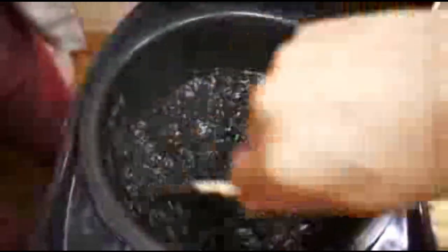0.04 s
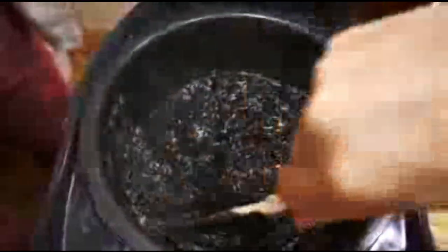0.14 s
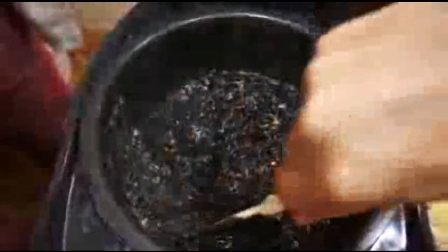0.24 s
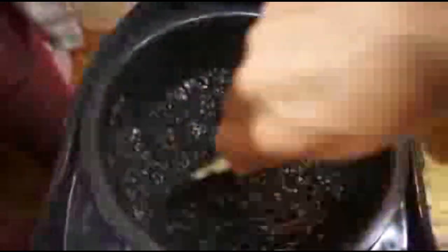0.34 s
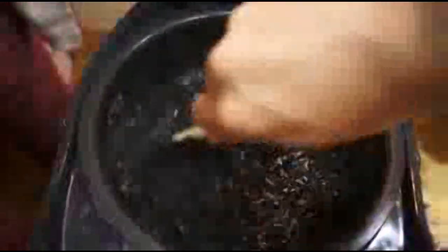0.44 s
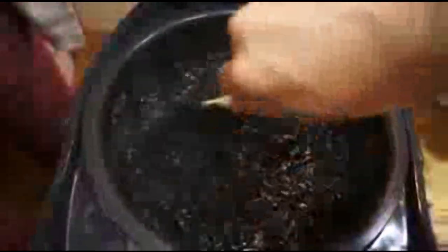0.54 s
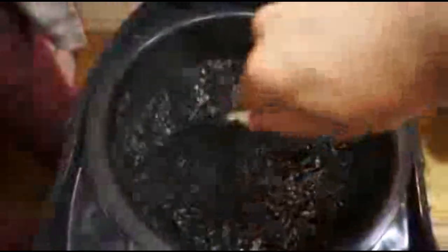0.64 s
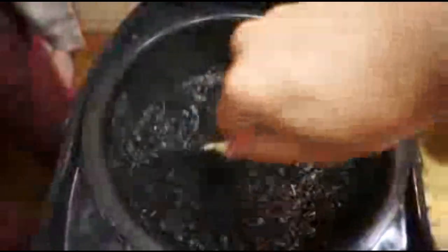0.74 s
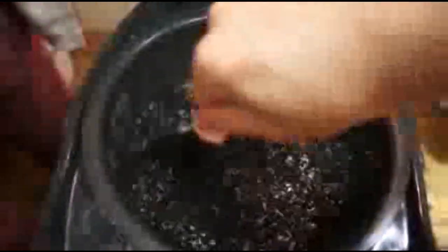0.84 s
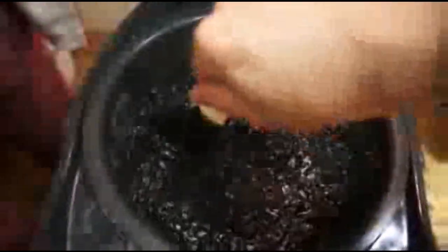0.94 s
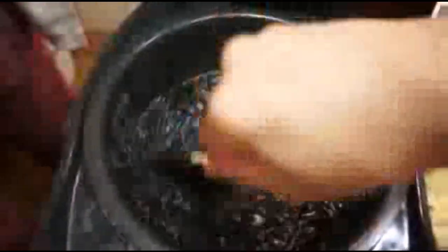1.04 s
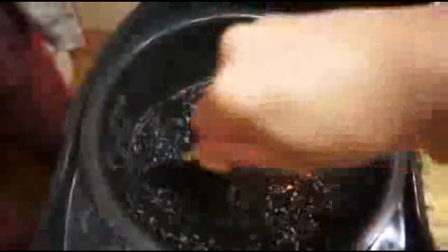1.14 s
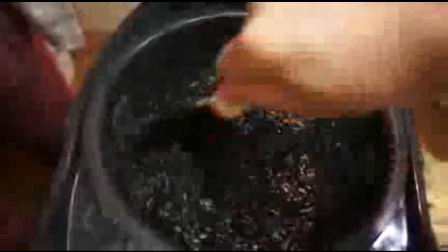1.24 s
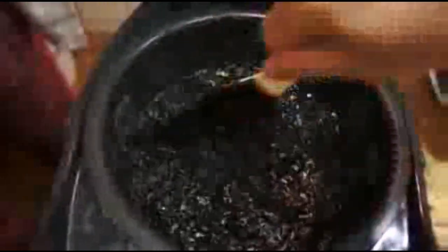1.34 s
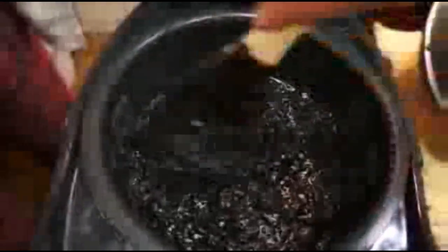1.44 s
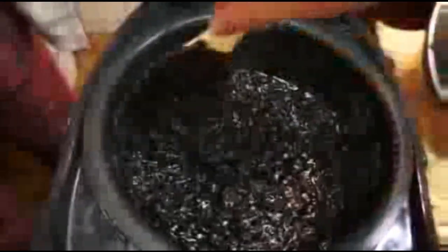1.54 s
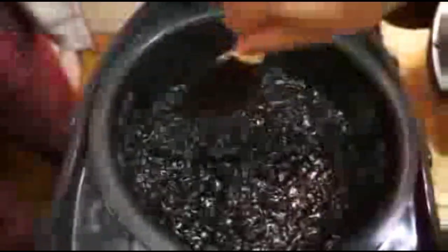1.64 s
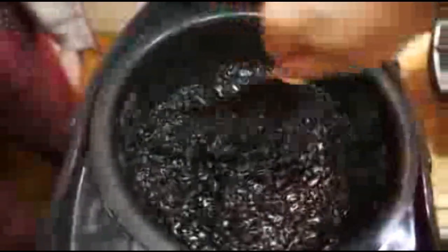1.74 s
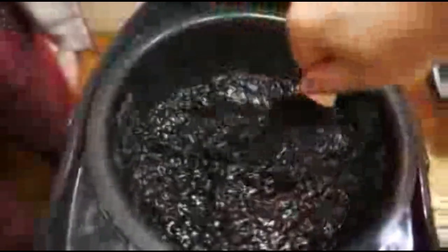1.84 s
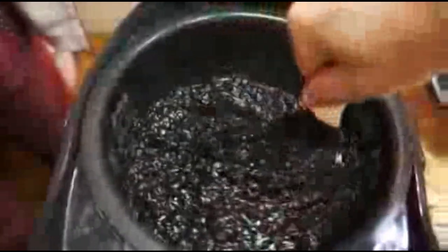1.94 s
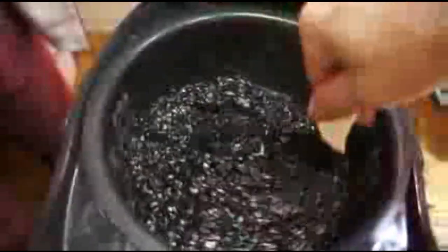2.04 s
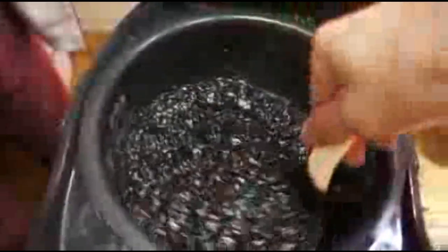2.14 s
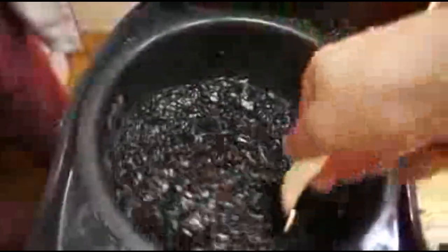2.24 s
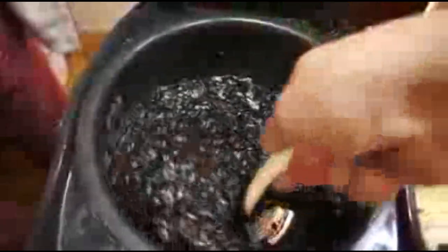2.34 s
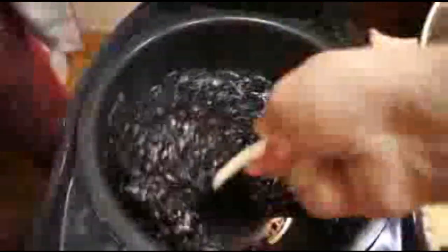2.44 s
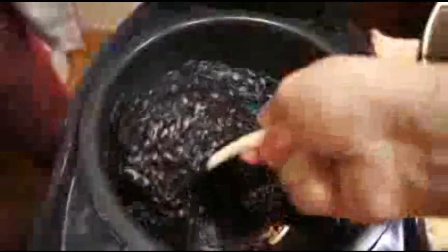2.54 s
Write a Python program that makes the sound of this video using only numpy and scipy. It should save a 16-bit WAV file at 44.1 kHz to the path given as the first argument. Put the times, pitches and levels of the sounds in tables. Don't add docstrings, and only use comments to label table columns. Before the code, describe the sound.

A rice paddle knocks and scrapes a heavy pot of sticky rice, with wet crackling grains

```python
import sys
import numpy as np
from scipy import signal
from scipy.fft import rfft, irfft, next_fast_len
from scipy.io import wavfile
from scipy.ndimage import uniform_filter1d, map_coordinates

SR = 44100
rng = np.random.default_rng(int(sys.argv[2]) if len(sys.argv) > 2 else 0)


def ratio(d):
    e = np.asarray(d, float) / 20
    return 10 ** e


def dump(signal):
    limited = np.clip(np.atleast_2d(signal).T, -1, 1)
    pcm = np.round(limited * 32767).astype(np.int16)
    wavfile.write(sys.argv[1], SR, pcm)


N = 114660

# pitch_hz, level_db, t60_s
POT = [(260.6, -7.5, 0.064), (302.3, -6, 0.037), (487.7, 0.5, 0.077), (533.5, 3, 0.076), (730, -1, 0.02),
       (1070, -2, 0.022), (1305, 0.5, 0.043), (1440, -8, 0.015), (2091, -4, 0.037), (2850, -6, 0.044),
       (3393, -4, 0.031), (5270, -4.5, 0.011), (6510, 7.5, 0.0083), (7150, -5, 0.071)]
# start_s, peak_db, contact_hz, ring_db, crack_db
WALL = [
    (0.1143, -22.5, 2025, 1.5, -20),
    (0.6124, -30.5, 3320, -3.5, -2.5),
    (1.736, -25.5, 1690, -3.5, -10.5),
]
# start_s, peak_db, contact_hz, ring_db, crack_db
BOTTOM = [
    (.4605, -27.5, 553, -3, -17.5),
    (0.907, -42, 321, 3, -3),
    (.9895, -19, 1404, -21.5, -46),
    (1.282, -24.5, 717, -6.5, -28),
    (1.9134, -27.5, 1430, -4.5, -26),
    (1.9145, -22.5, 343, -4.5, -49),
    (2.179, -26, 5200, -4, -9.5),
    (2.1808, -16.5, 997, -15.5, -19),
    (2.563, -32, 1910, -8.5, -31),
]


def unit(x):
    return x / np.sqrt(np.mean(x ** 2) + 1e-20)


def along(points, hz):
    f, v = np.transpose(points)
    return np.interp(np.log(hz + 1), np.log(f + 1), v)


def wobble(rate):
    knots = rng.standard_normal(int(N * rate / SR) + 4)
    return map_coordinates(knots, [np.arange(N) * rate / SR])


def filtered(x, response):
    m = next_fast_len(N + SR // 2)
    return irfft(rfft(x, m) * response(np.fft.rfftfreq(m, 1 / SR)), m)[..., :N]


def add(track, s, sound):
    part = track[..., max(round(s * SR), 0):][..., :sound.shape[-1]]
    part += sound[..., :part.shape[-1]]


def gritty(rate, spread_db, bed_db):
    draw = rng.random((2, N))
    size = ratio(-spread_db * np.log(draw[1] + 1e-9))
    slips = (draw[0] < rate / SR) * size * rng.standard_normal(N)
    return unit(unit(slips) + ratio(bed_db) * rng.standard_normal(N))


def pair(a, b):
    # pitch_hz, left-right likeness (0 to 1)
    likeness = [(60, 0.97), (500, 0.93), (2000, 0.74), (5000, 0.27), (8000, 0.5)]

    def spread(hz):
        turn = np.arccos(np.clip(along(likeness, hz), -1, 1)) / 2
        return np.array([np.cos(turn), np.sin(turn)])

    mid, side = filtered(np.array([a, b]), spread)
    return np.array([mid + side, mid - side])


def pops(s, hz, db, size_db, cycles):
    k, draw = np.arange(200), rng.random((len(s), 2, 1))
    cyc = k / SR * np.minimum(hz, 7900)[:, None]
    level_db = db[:, None] - size_db * np.log(draw[:, 0] + 0.019) - 30 * cyc / cycles
    wave = ratio(level_db) * np.sin(2 * np.pi * cyc)
    at = ((s[:, None] * SR).astype(int) + k).ravel()
    sides = (1, np.sign(draw[:, 1] - .5))
    return pair(*[np.bincount(at, (wave * g).ravel(), N + SR)[:N] for g in sides])


def starve(x):
    ahead_s, length_s, depth_db, threshold_db = .021, .013, -20, -29
    t, dip_db = np.arange(N) / SR, 0
    for s, peak_db, *_ in WALL + BOTTOM[:4]:
        dip = np.exp(-((t - s + ahead_s - length_s / 2) / length_s * 2) ** 4)
        dip_db = dip_db + depth_db * dip / (1 + ratio(2 * (threshold_db - peak_db)))
    return x * ratio(dip_db)


def gaps(x):
    hole_db, hole_s, odds, nearness, spared_s = -22, .055, 1.8, 1.7, .011
    hz, s, z = signal.stft(x, SR, nperseg=512)
    field = uniform_filter1d(rng.standard_normal(z.shape[1:]), size=7, axis=0)
    field = unit(uniform_filter1d(field, size=3, axis=1))

    def bump(rows, width_s):
        return np.minimum(sum(np.exp(-((s - row[0]) / width_s) ** 2) for row in rows), 1)

    free = 1 - bump(WALL + BOTTOM, spared_s)
    treble = ((hz > 1700) & (hz < 7600))[:, None]
    holes = (field + nearness * bump(BOTTOM[:5] + [(2.14,)], hole_s) > odds) * treble
    return signal.istft(z * ratio(free * hole_db * holes), nperseg=512)[1][:, :N]


def gated(x):
    gate_db = -101
    z = signal.stft(x, nperseg=512)[2]
    power = uniform_filter1d(np.mean(np.abs(z) ** 2, 0), size=5, axis=0)
    power = uniform_filter1d(power, size=4, axis=1)
    return signal.istft(z * (power > ratio(2 * gate_db)), nperseg=512)[1][:, :N]


def hush():
    # pitch_hz, level_db per Hz
    air_curve = [(15, -43), (25, -26), (157, -13.5), (2640, -24), (2900, -28.5), (6760, -24), (8000, -19.5),
                 (10400, -32.5), (17600, -120)]
    air_db, whine_db, whine_hz, whine_wide_hz = -65, -76, 7900, 180
    air = unit(pair(*filtered(rng.standard_normal((2, N)), lambda f: ratio(along(air_curve, f)))))
    whine = filtered(rng.standard_normal((2, N)), lambda f: np.exp(-((f - whine_hz) / whine_wide_hz) ** 2))
    return ratio(air_db + 0.32 * wobble(6)) * air + ratio(whine_db) * unit(whine)


def room(x):
    # pitch_hz, t60_s
    decay = [(200, 0.42), (2000, 0.2), (8000, 0.16)]
    hz, t, z = signal.stft(rng.standard_normal((2, SR // 2)), SR, nperseg=256)
    tail = signal.istft(z * ratio(-60 * t / along(decay, hz)[:, None]), SR, nperseg=256)[1]
    tail = tail / np.linalg.norm(tail[0])
    late = np.pad(x, (200, 0))[None]
    return pair(*signal.fftconvolve(late, tail, axes=1)[:, :N])


def lurch():
    # start_s, length_s
    moments = [(.46, .11), (.27, .06), (1.02, .13), (1.92, .14), (1.25, .14), (.62, .1), (2.1, .1),
               (1.275, .05)]
    # level_db, pitch_hz
    pushes = [
        (-53, 43),
        (-59, 210),
        (-67, 45),
        (-56.5, 39),
        (-68, 33),
        (-70, 49),
        (-68, 18),
        (-60.5, 132),
    ]
    out = np.zeros(N)
    for (s, length), (db, hz) in zip(moments, pushes):
        t = np.arange(int(length * SR)) / SR
        add(out, s, ratio(db) * np.sin(np.pi * t / length) ** 2 * np.sin(2 * np.pi * hz * t))
    return out


def slides():
    # start_s, length_s
    moments = [(.15, .1), (.55, .06), (.6, .08), (.88, .06), (1.34, .16), (1.82, .14), (2.185, .07),
               (2.2, .22), (2.42, .18)]
    # level_db, start_hz, end_hz
    drifts = [
        (-47.5, 7500, 5900),
        (-72, 1500, 2900),
        (-49.5, 7100, 6800),
        (-60.5, 1500, 2900),
        (-55, 8400, 6700),
        (-55, 3840, 2600),
        (-51.5, 6300, 8100),
        (-63.5, 3400, 2870),
        (-61, 2500, 2200),
    ]
    rate, cycles, spread_oct, size_db = 1900, 9.2, .12, 3
    rows = []
    for (s, length), (db, hz0, hz1) in zip(moments, drifts):
        where, spread = rng.random(400), rng.standard_normal(400)
        hz = (hz0 + (hz1 - hz0) * where) * 2 ** (spread_oct * spread)
        level_db = db + 10 * np.log10(np.sin(np.pi * where) + .01)
        rows.append(np.c_[s + length * where, hz, level_db][:int(rate * length)])
    return pops(*np.concatenate(rows).T, size_db, cycles)


def ticks():
    # start_s, peak_db, pitch_hz
    single_ticks = [(.145, -41, 4200), (.158, -42, 2980), (.161, -45, 7160), (.191, -42, 4300),
                    (.204, -42, 6540), (.212, -39.5, 6700), (.218, -35.5, 6850), (.231, -36.5, 5650),
                    (.232, -45, 4300), (.263, -41, 7240), (.343, -59.5, 3500), (.379, -43, 6540),
                    (.419, -43, 6100), (.857, -45, 7500), (1.019, -45, 5700), (1.274, -41, 6300),
                    (1.336, -43, 6400), (1.3765, -40, 7600), (1.417, -61, 7260), (1.429, -39, 7700),
                    (1.861, -48.5, 3420), (1.983, -48.5, 2500), (2.0275, -46.5, 6800), (2.029, -55, 4000),
                    (2.157, -45.5, 5030), (2.229, -39, 7200), (2.3084, -43, 3660), (2.378, -45, 6700),
                    (2.433, -46, 2450), (1.39, -53, 7250), (1.436, -49.5, 3980), (1.833, -45.5, 3340),
                    (1.8435, -49.5, 3500), (1.518, -51, 2230), (.32, -40, 6400)]
    burst_s, spread_oct, cycles, pop_db = 0.0028, 0.18, 16, -6.5
    s, db, hz = np.repeat(single_ticks, 6, axis=0).T
    draw = rng.standard_normal((len(s), 2))
    when = s + burst_s * np.abs(draw[:, 0]) / 2
    return pops(when, hz * 2 ** (spread_oct * draw[:, 1]), db + pop_db, 0.86, cycles)


def stroke():
    # start_s, pressure_db on the pot, slip_db through the grains
    motion = [(0, -70.5, -84), (.1, -72.5, -67.5), (.19, -55, -52), (0.298, -68, -62.5),
              (0.532, -64, -66.5), (.6, -54, -53.5), (0.802, -68, -67.5), (0.892, -45, -65),
              (.96, -52, -61.5), (1.06, -59.5, -67.5), (1.17, -60, -80.5), (1.36, -57, -68.5),
              (1.599, -70, -64.5), (1.719, -70, -96), (1.8, -59.5, -66), (2.0, -57, -72), (2.26, -55, -60),
              (2.6, -59.5, -73.5)]
    # start_s, length_s, extra_pressure_db
    rubs = [
        (0.35, 0.028, 1),
        (0.2815, 0.033, 11),
        (1.97, 0.025, 6),
        (2.7, 0.11, 10),
        (3.2, .06, 7),
        (0.75, 0.069, 2),
        (.84, 0.071, -7),
        (2.38, 0.062, 0.5),
        (2.47, 0.19, 6.5),
        (0.89, 0.037, 4.5),
    ]
    slip_rate, slip_spread_db, bed_db, tilt_db = 500, -2, -11, -9.5
    fizz_hz, fizz_oct, fizz_cycles, fizz_size_db, fizz_count = 3960, 0.79, 16, 3.5, 5000
    s, press_db, slip_db = np.transpose(motion)

    def body(f):
        total = 0
        for k, (c, db, t60) in enumerate(POT):
            width = 6 / t60
            gain = (-1) ** k * ratio(db + tilt_db * np.log2(c / 500))
            total = total + gain * 1j * f * width / (c * c - f * f + 1j * f * width)
        return total

    drag = unit(pair(*[filtered(gritty(slip_rate, slip_spread_db, bed_db), body) for side in "ab"]))
    when = rng.random(fizz_count) * N / SR
    hz = fizz_hz * 2 ** (fizz_oct * rng.standard_normal(fizz_count))
    fizz = unit(pops(when, hz, 0 * when, fizz_size_db, fizz_cycles))
    t = np.arange(N) / SR
    rub_db = sum(db * np.exp(-((t - at - length / 2) / length * 2) ** 4) for at, length, db in rubs)
    drag_db = np.interp(t, s, press_db) + rub_db + 3.35 * wobble(29.81)
    fizz_db = np.interp(t, s, slip_db) + 3 * wobble(40.57)
    return drag * ratio(drag_db) + fizz * ratio(fizz_db)


def paddle():
    # start_s, peak_db, contact_hz, crack_db
    light_taps = [(0.318, -51, 264, -5), (0.365, -44.5, 504, -9.5), (0.429, -39.5, 545, -15),
                  (0.592, -44, 550, -5.5), (.66, -43.5, 598, -17), (0.725, -50.5, 463, 2),
                  (.9068, -30.5, 2300, -30), (0.886, -44, 467, -18), (.996, -33.5, 470, -35),
                  (1.029, -42.5, 605, -36), (1.04, -42.5, 6060, -18), (1.096, -42, 6400, -30),
                  (1.163, -48, 2200, -18), (1.221, -37.5, 313, -22), (1.232, -40, 6400, -26),
                  (0.6134, -30.5, 1570, -32), (1.518, -45.5, 2260, -4), (1.833, -53.5, 3140, -6),
                  (1.844, -58, 3100, 12), (1.9, -34.5, 3360, -27), (1.941, -39.5, 3160, -22),
                  (1.969, -37.5, 510, -30), (2.112, -66.5, 3450, 6), (2.185, -40, 314, -35),
                  (2.3, -35.5, 580, -24), (2.497, -42.5, 755, -13.5), (2.521, -44.5, 285, -14.5),
                  (2.58, -54.5, 590, 10)]
    # start_s, peak_db, contact_hz, ring_db,
    # crack_db
    more_blows = [
        (0.13, -35, 600, 4.5, -48.5),
        (0.59, -36, 570, 0.5, -32),
        (.1168, -25, 1430, 1.5, -27),
        (.9892, -32, 2300, -8, -42),
        (.9905, -30.5, 535, -1.5, -35),
        (1.2822, -41.5, 3260, 0, -26),
        (1.9135, -25, 3000, -19, -18),
        (1.9165, -26, 238, 1, -51.5),
        (1.915, -26.5, 630, -8.5, -36),
        (2.184, -30, 1250, -4, -31),
    ]
    wall_damp, bottom_damp, detune = 0.89, 0.47, 0.073
    tap_ring_db, rattle_db, rattle_s = -2.5, -9.5, 0.095
    contact_cycles, swell_s, reach_oct, scatter_db = 2.5, 0.00036, 1.0, 1.5
    crack_s, crack_rise_s, crack_band_hz = .022, .0012, (2200, 6000)
    puff_db, puff_s = -35.5, 0.36
    smear_s, smear_db = .011, -28
    low_cut_hz = 94
    out, t = np.zeros((2, N + SR)), np.arange(SR // 4) / SR
    hz, level_db, t60 = np.transpose(POT)[:, :, None]
    bright = signal.butter(1, crack_band_hz, "band", fs=SR)
    hits = [(*row, wall_damp) for row in WALL + more_blows]
    hits += [(*row, bottom_damp) for row in BOTTOM]
    hits += [(s, db, c, tap_ring_db, k, bottom_damp) for s, db, c, k in light_taps]
    for s, db, contact_hz, ring_db, crack_db, damp in hits:
        u = t * contact_hz / contact_cycles
        push = np.sin(np.pi * np.minimum(u, 1)) ** 2 * np.sin(2 * np.pi * contact_hz * t)
        draw, noise = rng.standard_normal((3, *hz.shape)), rng.standard_normal((3, len(t)))

        reach_db = -6 * (np.log2(hz / contact_hz) / reach_oct) ** 2 + scatter_db * draw[0]
        mode_hz = hz * (1 + detune * (1 - damp) * draw[1])
        modes = ratio(level_db + reach_db - 60 * t / t60 / damp) * np.sin(2 * np.pi * mode_hz * t)
        ring = np.sum(modes * np.sign(draw[2]), 0)

        half = push[u < 1 / 2]
        shake = unit(np.convolve(noise[2], half - half.mean())[:len(t)])
        rattle = ratio(rattle_db + 13.5 - 26.7 * damp - 60 * t / rattle_s) * shake
        body = ratio(ring_db) * (ring + rattle) * (1 - np.exp(-t / swell_s))

        hiss = signal.lfilter(*bright, noise[:2]) * ratio(crack_db + 12)
        fade = ratio(-60 * t / crack_s) + ratio(puff_db - 60 * t / puff_s)
        crack = hiss * (1 - np.exp(-t / crack_rise_s)) * fade
        add(out, s, ratio(db) * (crack + [push + body, 0 * t]))

        lead = t[t < smear_s]
        smear = (hiss + [shake, 0 * t])[:, -len(lead):]
        add(out, s - smear_s, ratio(db + smear_db) * lead / smear_s * smear)
    return pair(*filtered(out[:, :N], lambda f: (1j * f / (low_cut_hz + 1j * f)) ** 2))


def scene():
    # pitch_hz, left_minus_right_db
    lean = [(100, 0.5), (500, -0.5), (5000, -1)]
    # pitch_hz, left_lead_rad
    port_lead = [(200, -.05), (1200, -0.17), (3000, -.3), (7000, 0)]
    room_db = -11.5
    knocks = paddle()
    back = ratio(room_db) * room(knocks.mean(0)) + stroke() + slides() + hush()
    both = gaps(knocks + starve(back)) + lurch() + ticks()
    sides = np.array([[1], [-1]])
    return filtered(both, lambda f: ratio(along(lean, f) / 2 * sides) * np.exp(.5j * along(port_lead, f) * sides))


def top_cut(x):
    return signal.sosfilt(signal.butter(12, 16520, fs=SR, output="sos"), x)


def record(dry):
    # pitch_hz, level_db
    mirror = [(8000, -60), (9800, -58), (10400, -35), (11200, -27), (11650, -27), (11800, -16),
              (11950, -20), (12050, -70)]
    # pitch_hz, level_db
    next_mirror = [(13800, -42), (14100, -15.5), (14800, -26), (15200, -17.5), (15500, -43), (15800, -68)]
    rate_hz, next_rate_hz, edge_hz, mirror_lean_db = 16000, 22050, 8050, -6
    t = np.arange(N) / SR
    base = filtered(dry, lambda f: 1 / (1 + (f / edge_hz) ** 120))

    def fold(rate, shape):
        image = 2 * base * np.cos(2 * np.pi * rate * t)
        return filtered(image, lambda f: ratio(along(shape, f)) * (f > shape[0][0]) * (f < shape[-1][0]))

    images = gated(fold(rate_hz, mirror) + fold(next_rate_hz, next_mirror))
    mix = base + ratio(mirror_lean_db / 2 * np.array([[1], [-1]])) * images
    return top_cut(mix)


dry = scene()
out = record(dry)
dump(out)
```